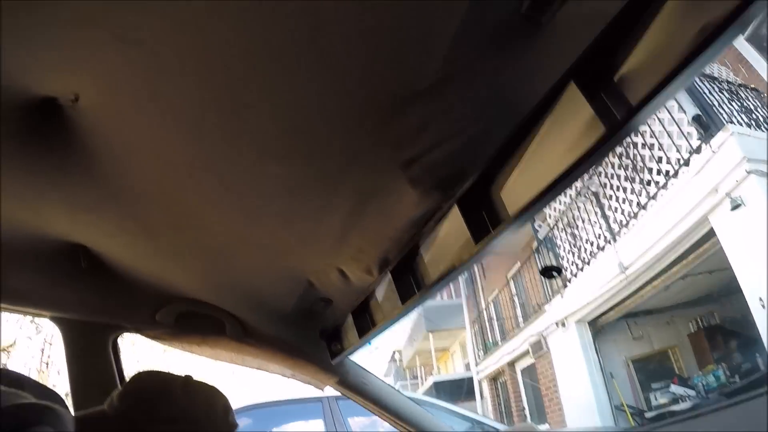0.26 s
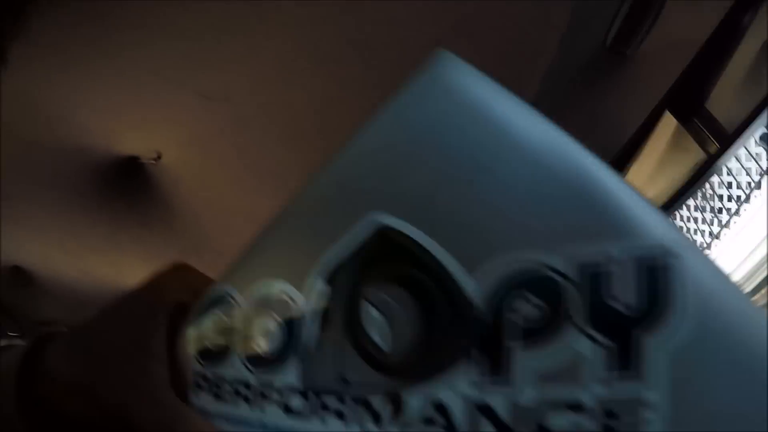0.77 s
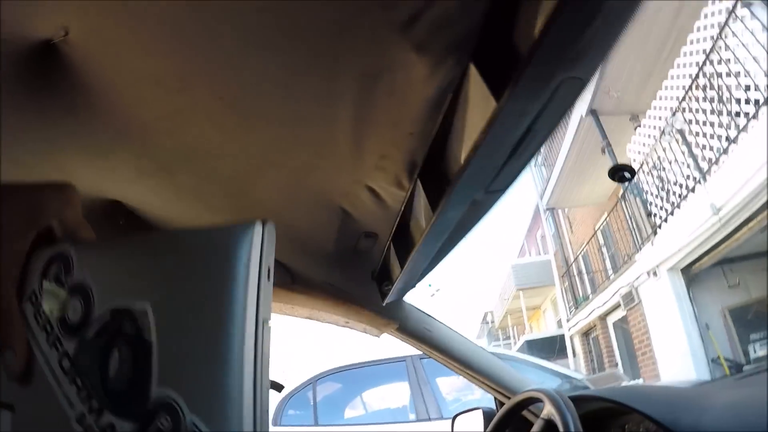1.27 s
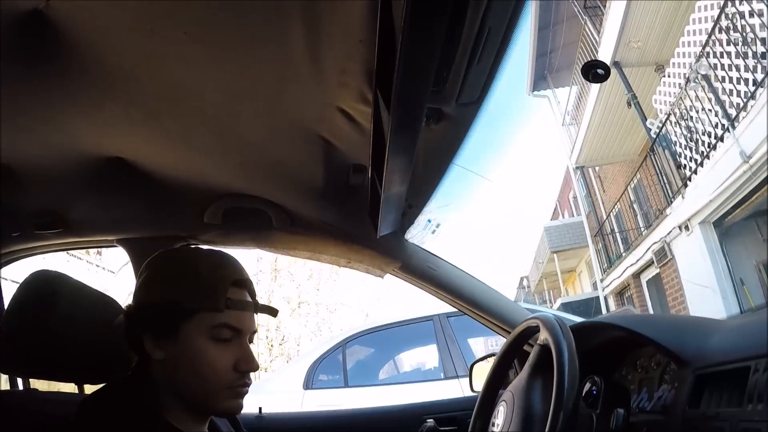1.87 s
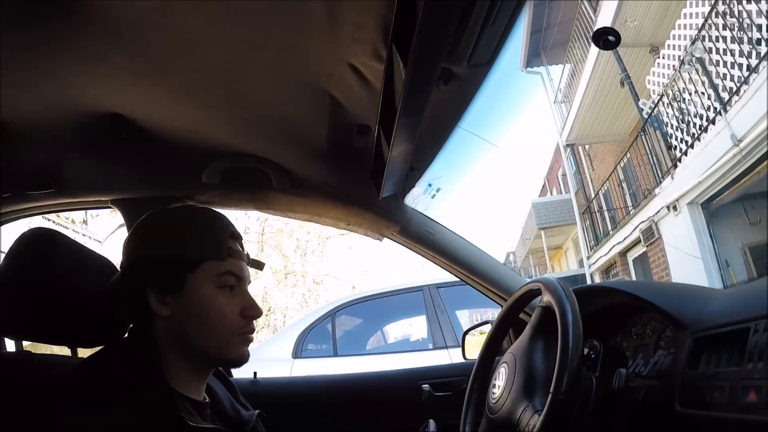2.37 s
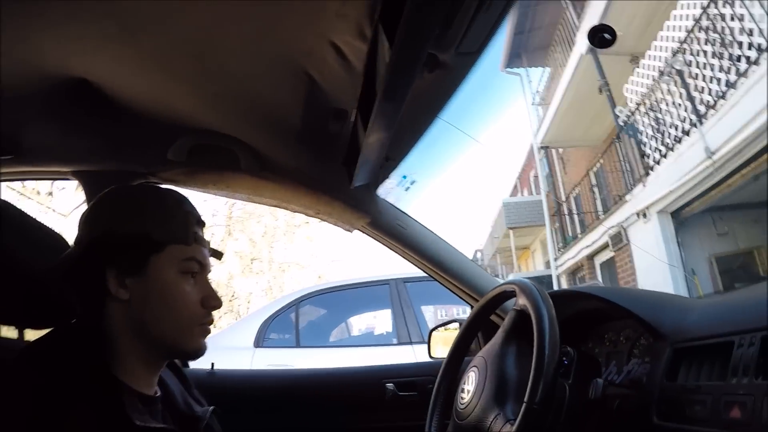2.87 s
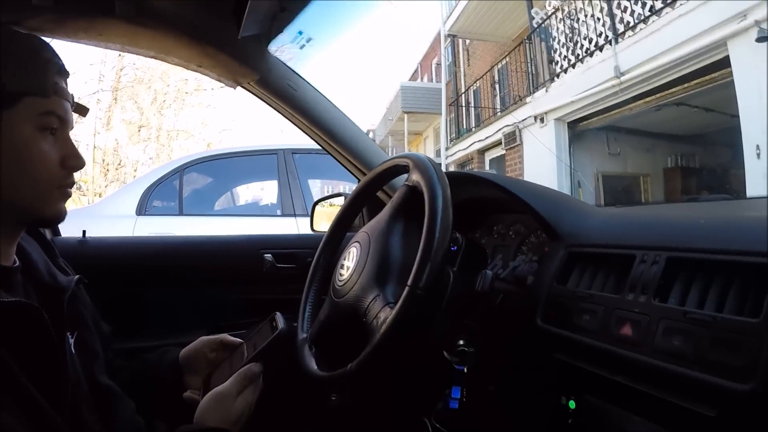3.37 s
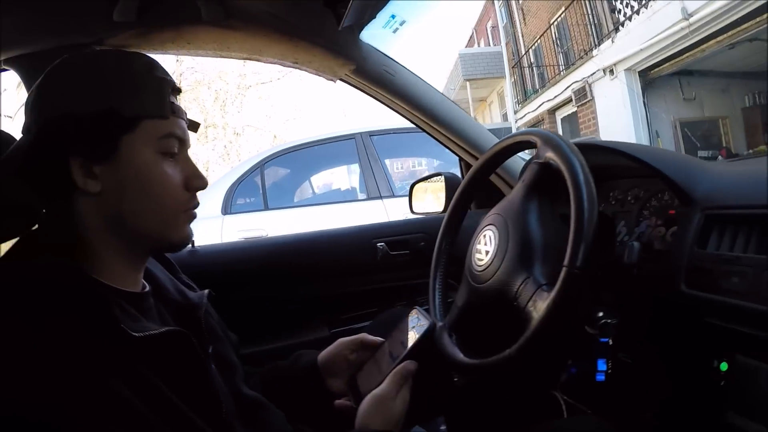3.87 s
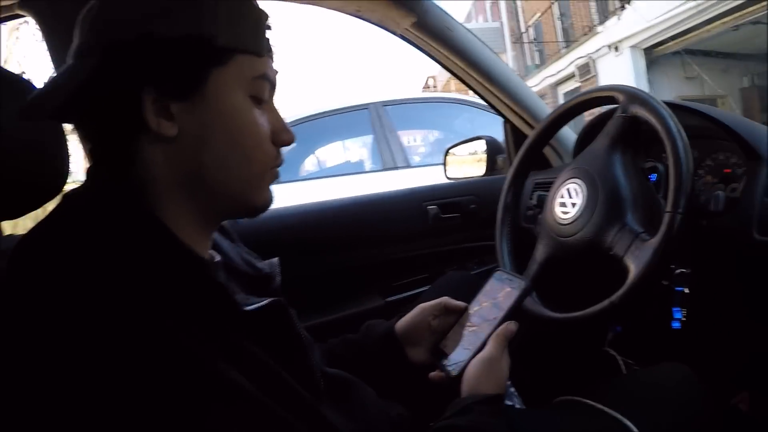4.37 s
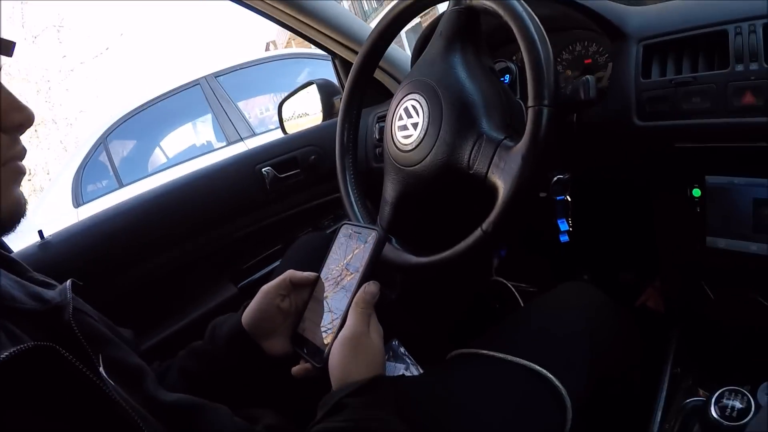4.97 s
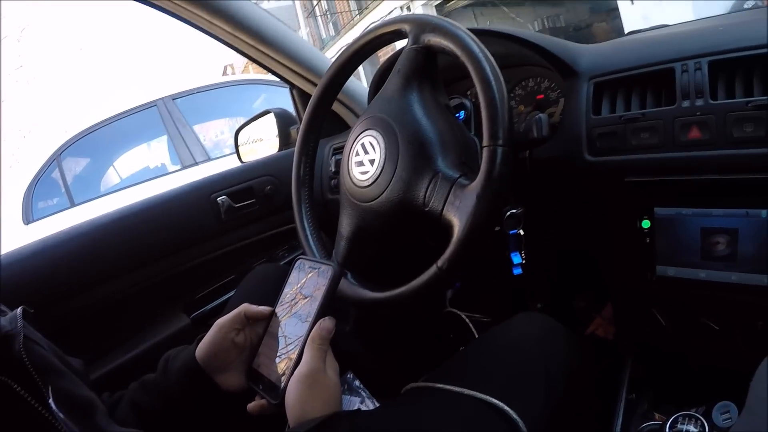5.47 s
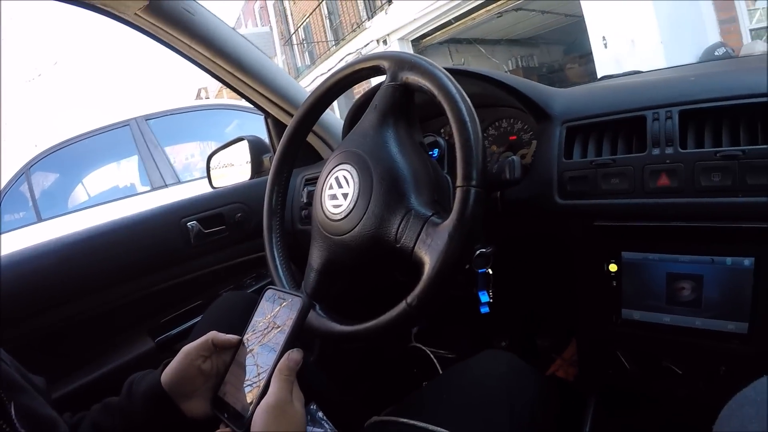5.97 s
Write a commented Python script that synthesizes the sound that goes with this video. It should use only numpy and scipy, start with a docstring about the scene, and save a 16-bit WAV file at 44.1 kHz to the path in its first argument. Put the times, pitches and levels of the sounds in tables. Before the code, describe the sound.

Boomy cabin sound of a turbocharged car at idle, heard by a handheld camera. Small case creaks precede a loud, sharp thump that briefly ducks the sound; finger knocks and clicks follow, densest near one and a half seconds. The revs then climb in two stages, the second much louder and brighter with rushing air, peak around five and a half seconds and begin sliding down. Steady light hiss lies underneath.

```python
"""A soft, uneven idle booms in a parked car's cabin amid faint plastic creaks; a hard bump soon follows.
The turbocharged four-cylinder is then revved slowly to about 3500 rpm and starts to fall back.
Firing orders are sinusoids locked to the crank phase and coloured by the cabin; gas, valve gear and
intake are pulsing noise, and turbo, soft rubs and passing swells are bands of noise. Handling of the
camera sets off decaying modes; its limiter ducks the loudest peaks and it adds a steady hiss."""
import sys
import numpy as np
from scipy import signal
from scipy.fft import rfft, irfft, next_fast_len
from scipy.io import wavfile
from scipy.ndimage import uniform_filter1d, minimum_filter1d

SR = 44100
rng = np.random.default_rng(int(sys.argv[2]) if len(sys.argv) > 2 else 0)


def digitize_waveform(pressure):
    """Quantize a signal to 16-bit integers and store it at the path in sys.argv[1].

    Rows of a 2-D input are taken as channels; values are limited to [-1, 1].
    """
    field = np.atleast_2d(pressure).T
    bounded = np.clip(field, -1, 1)
    quanta = np.round(bounded * 32767).astype(np.int16)
    wavfile.write(sys.argv[1], SR, quanta)


N = 273640
T = np.arange(N) / SR
IDLE_HZ = 25.5  # firing rate at idle

# How the exhaust grows with effort: level at idle in dB, rise in dB per Hz of firing rate above idle,
# dB added at full throttle, power to which the throttle opening is raised.
EXHAUST_LAW = (-42.5, 0.1489, 8.5, 0.8)


def boom(hz, phase, throttle, waver_db=0.58, uneven_db=1.5, slip=0.085):
    """Room modes: firing orders 1 to 4 swell and fade as they sweep the cabin's booms; uneven burns shake them."""
    # Strength of orders 1 to 4. Each row: level at idle in dB, dB added well off idle, dB added at full throttle.
    order_levels = [(1, 1, -0.5), (-4, -4, 11), (-12, 4, 6), (-27, 20, 0)]
    # Booms and nulls of the closed cabin. Each row: frequency in Hz, gain in dB.
    cabin_booms = [(25, -17), (28, -12), (30, -13), (33, -21.5), (40, -18), (45, -26.5), (49, -20.5),
                   (58, -18.5), (74, -11.5), (90, -10.5), (98, -16), (110, -13), (117, -25), (131, -17.5),
                   (150, -34), (172, -19), (195, -13), (208, -20.5), (228, -20), (262, -25), (340, -34.5),
                   (395, -29), (450, -44.5)]
    pull_hz = 22.6  # rise in firing rate over which the engine leaves its soft idle
    pulling = np.clip((hz - IDLE_HZ) / pull_hz, 0, 1)
    out = 0
    for order, (idle_db, pull_db, throttle_db) in enumerate(order_levels, 1):
        db = idle_db + pull_db * pulling + throttle_db * throttle
        db = db + waver_db * walk(5) + uneven_db * walk(25)
        angle = 2 * np.pi * (order * phase + rng.random()) + slip * walk(12)
        swing = np.sqrt(2) * np.sin(angle)
        out = out + undb(db) * response(order * hz, cabin_booms) * swing
    return out


def overtones(hz, phase, whole_db=7.0, half_db=-3.5, fall_db=1.72, count=20):
    """Fourier series of the firing pulse: higher orders, and half orders from unequal cylinders."""
    # How the cabin passes the higher exhaust orders. Each row: frequency in Hz, gain in dB.
    cabin = [(60, -5.5), (130, 9), (160, 6), (191, 11), (215, 0.5), (275, 5), (365, -2), (440, -21),
             (540, -12.5), (680, -31), (1050, -13.5), (1600, -24), (2400, -26)]
    rough_db, slip = 2.5, 0.15  # wander of the level in dB and of the phase in radians
    spread = 0.5  # widest starting offset, in cycles
    out = 0
    whole = [(k, whole_db) for k in range(5, count)]
    halves = [(k + .5, half_db) for k in range(2, count)]
    for order, db in whole + halves:
        # the orders stay roughly in step, so each firing is felt as a throb
        swing = np.cos(2 * np.pi * (order * phase + spread * rng.random()) + slip * walk(12))
        # a pulse lasts a fixed crank angle, so the sound brightens as the speed rises
        level = undb(db - fall_db * order + rough_db * walk(4.8))
        out = out + level * response(order * hz, cabin) * swing
    return out


def rocking(hz, phase, level_db=-17.0, crank_db=-28.0, coast_hz_s=35.):
    """Forced resonance: as the speed falls, the four-firing cycle and the crank's turns shake the mounts."""
    cylinders, mount_hz, width_hz = 4, 27.3, 1.8
    slowing = -np.gradient(uniform_filter1d(hz, SR // 10)) * SR  # Hz per second
    overrun = np.clip(slowing / coast_hz_s, 0, 1)
    mounts = 1 / (1 + ((hz / cylinders - mount_hz) / width_hz) ** 2)
    cycle = undb(level_db) * np.sin(2 * np.pi * phase / cylinders)
    crank = undb(crank_db) * np.sin(np.pi * phase)
    return overrun * mounts * (cycle + crank)


def engine_noise(hz, phase, throttle, rumble_db=0.66, puff=0.38, tick=0.16, flicker_db=1.5):
    """Amplitude modulation: gas rumble puffs with each firing; valve gear and intake pulse more lightly."""
    # Growth of valve gear and intake with effort; same columns as the exhaust law.
    valve_law, intake_law = (-53.5, 0.1371, 8, 1.7), (-64.5, 0.1361, 8.5, 2.5)
    # Noise spectra of gas, valve gear and intake. Each row: frequency in Hz, relative density in dB.
    gas_colour, valve_colour, intake_colour = [(20, -5.5), (45, -2), (90, -4), (140, -5.5), (190, 2),
                                               (250, 0), (320, -2.5), (380, -7), (450, -14), (650, -29.5),
                                               (1000, -56.5)], [(290, -30), (500, 6), (528, -3.5),
                                                               (704, -1.5), (755, -7), (816, -3), (983, -8),
                                                               (1060, -5.5), (1170, -7.5), (1760, -11.5),
                                                               (2190, -13.5), (2800, -20), (3200, -24),
                                                               (4160, -52.5), (7040, -120)], [(1650, -34.5), (2800, -19),
                                                                               (3290, -4.5), (3820, 3),
                                                                               (4250, 4), (4400, 0.5),
                                                                               (4490, -1), (6160, -7.5),
                                                                               (7140, -17), (7530, -23.5),
                                                                               (8740, -18.5),
                                                                               (10300, -24.5),
                                                                               (11400, -31.5), (12900, -24),
                                                                               (14000, -28.5)]
    gas_db = effort_db(EXHAUST_LAW, hz, throttle) + rumble_db
    valve_db = effort_db(valve_law, hz, throttle) + flicker_db * walk(25)
    intake_db = effort_db(intake_law, hz, throttle) + flicker_db * walk(25)
    beat = np.cos(2 * np.pi * phase)
    turn = np.cos(np.pi * phase)  # one turn of the crank is two firings
    gas = undb(gas_db) * noise(gas_colour) * (1 + puff * beat)
    valves = undb(valve_db) * noise(valve_colour)
    intake = undb(intake_db) * noise(intake_colour)
    return gas + (valves + intake) * (1 + tick * (beat + turn) / 2)


def turbo(width_hz=1500.):
    """Flow noise: a band of rushing air whose centre moves with the speed of the compressor."""
    # Course of the whoosh. Each row: time in seconds, centre in Hz, level in dB.
    whoosh = [(0, 3004, -89), (4.85, 3137, -73.5), (5.1, 3894, -47.5), (5.3, 6112, -62), (5.4, 7420, -61.5),
              (5.52, 8068, -87), (5.7, 7117, -62), (6.08, 5865, -55), (6.2, 5708, -56)]
    hz, db = curves(whoosh)
    return undb(db) * rush(hz, width_hz)


def bump():
    """Impact excitation: the camera strikes the trim and rebounds, ringing the trim's modes."""
    # Blows on the trim. Each row: start in seconds, peak in dB, contact time in ms.
    impacts = [(.4610, 1, 0.2), (.4630, 11.5, 0.87), (.4745, 2, 0.53), (.4810, 5, 2.2)]
    # Modes of the trim. Each row: frequency in Hz, level in dB, 60 dB decay time in seconds.
    trim_modes = [(163.3, 1, 0.12), (238.6, 1, 0.19), (294, -7, 0.059), (310.6, -5.5, 0.2),
                  (391.4, -7.5, 0.17), (545, -9.5, 0.12), (628, 6, 0.094), (680, 8.5, 0.041),
                  (801, 0.5, 0.096), (951, -9, 0.07), (1007, -6, 0.072), (1167, 0, 0.021),
                  (1344, -18, 0.072), (1720, 1.5, 0.044), (1857, -3, 0.029), (2090, -6, .04),
                  (2360, -19, 0.028), (4000, -24, 0.018), (4670, -2, .03)]
    return blows(impacts, trim_modes, scatter=0.0033, grit=0.68, grit_t60_s=0.086)


def knocks():
    """Impact excitation: fingers knock on the camera and ring the damped modes of the gripped body."""
    # Finger blows. Each row: start in seconds, peak in dB, contact time in ms.
    finger_hits = [(.543, -9.5, 1.4), (1.563, -21, 0.72), (1.605, -10.5, 0.69), (1.621, -14, 0.98),
                   (1.732, -21.5, 0.65), (1.785, -22.5, 1.3), (1.802, -25.5, 0.65), (2.475, -27, 0.99),
                   (2.538, -22.5, 2.1), (2.893, -23, 0.11), (2.899, -23, 0.23), (3.321, -28, 0.38),
                   (3.335, -25, 0.21), (4.475, -29.5, 0.19), (4.634, -22.5, 1.1)]
    # Modes of the gripped camera. Each row: frequency in Hz, level in dB, 60 dB decay time in seconds.
    grip_modes = [(329.5, 5.5, 0.059), (417, 3, 0.066), (596, 2.5, 0.07), (697, -2, 0.057),
                  (1015, -8.5, 0.073), (1330, -17.5, 0.042), (1890, -18, 0.0039)]
    return blows(finger_hits, grip_modes, scatter=0.095, grit=1.0, grit_t60_s=0.062)


def creaks(gain_db=3.5, grit_t60_s=0.029, tail_db=-24.0, tail_t60_s=0.2, top_db=-7.5, rise_s=0.00063):
    """Stick-slip: the plastic case slips in short clicks; where it slips decides which of its modes ring."""
    # Sharp creaks. Each row: start in seconds, level in dB before gain_db, low part in dB relative to
    # the middle part, top part in dB before top_db, ring length as a factor.
    sharp_clicks = [(0.1341, -31, 2.5, 0.5, 0.66), (0.1526, -28, 3.5, -9, 0.74),
                    (.3878, -34.5, -0.5, -6, 1.05), (0.4397, -34, 6.5, -4, 1.4), (0.4584, -23, 5, -10, 2.4),
                    (0.474, -21, 0, -21, .9), (.4814, -33, 1, -5, .8), (1.263, -32, -2, -3, 0.66),
                    (1.3896, -36.5, 2, -3, 0.65), (1.3988, -28, -1, -13, 0.64),
                    (1.4191, -29.5, -0.5, 8, 1.25), (1.4273, -36.5, 7.5, -16, 0.53),
                    (1.546, -33, 7, 2, 0.62), (1.5555, -28, 0, 3.5, 0.71), (1.5626, -24, -1, -8, 0.8),
                    (1.6625, -38.5, -11, -25, .8), (1.698, -45, -5, -5, 2.4), (2.1243, -40, -4.5, -4, 1.17),
                    (2.5166, -39, 0.5, 2, 1.6), (2.893, -31.5, -5, -9, 0.58), (2.8987, -31.5, -7, -5, 1.7),
                    (3.4084, -38.5, -23, -9, 0.71), (3.8702, -34, -9, -12.5, 0.74),
                    (4.0684, -34, 0.5, 2.5, 0.91), (4.238, -35.5, -4.5, -27, .8),
                    (4.361, -45, 6.5, -16, 0.92), (4.6782, -32.5, -14, -11, .73),
                    (4.7719, -30.5, 2, -4, 0.88), (4.8281, -39.5, 9, 3, 0.73)]
    # Modes of the case. Each row: frequency in Hz, mean level in dB, 60 dB decay time in seconds at factor 1.
    case_modes = [(1040, 1, 0.0086), (1570, -9.5, 0.0056), (1880, -7.5, 0.031), (2280, -7.5, 0.019),
                  (3280, -8.5, 0.0091), (3854, 1, 0.02), (4210, -4, 0.018), (4950, -13, 0.024),
                  (5530, -4.5, 0.018), (6170, 6.5, 0.0094), (7400, -1, 0.0068), (8460, -4, 0.01),
                  (11600, -26, 0.0092)]
    grit, uneven_db = 0.45, 3.5  # share of contact noise, spread of the mode levels
    edges_hz = ((700, 2800), (3200, 4800), (5200, 11000))  # low, middle and top parts
    bands = [signal.butter(3, edges, "band", fs=SR, output="sos") for edges in edges_hz]
    out = np.zeros(N)
    for s, db, low, top, length in [*sharp_clicks, *faint_clicks()]:
        modes = [(hz, mode_db + uneven_db * rng.standard_normal(), t60 * max(length, .2))
                 for hz, mode_db, t60 in case_modes]
        click = ring(modes, scatter=.035) + grit * crack(grit_t60_s) + undb(tail_db) * crack(tail_t60_s)
        onset = 1 - np.exp(-T[:len(click)] / rise_s)
        click = signal.fftconvolve(click * onset, slips())
        for band, part_db in zip(bands, (low, 0, top + top_db)):
            part = signal.sosfilt(band, click)
            add(out, s, undb(gain_db + db + part_db) * part / np.abs(part).max())
    return out


def faint_clicks(spread_db=2.5, low_db=2.5, top_db=-7.5, length=1.0, count=7):
    """Random stick-slip while the grip shifts: small slips, as rows like the sharp creaks."""
    # Shifts of the grip. Each row: start in seconds, end in seconds, mean level in dB before the creaks' gain.
    grip_shifts = [(0.051, 0.446, -51), (1.048, 1.386, -46), (1.402, 1.715, -45.5), (2.697, 3.393, -49),
                   (4.31, 4.897, -50)]
    clicks = []
    for start, end, db in grip_shifts:
        for k in range(count):
            s = start + (end - start) * (k + rng.random()) / count
            clicks.append((s, db + spread_db * rng.standard_normal(), low_db, top_db, length))
    return clicks


def slips(after_db=-26., within_s=0.019, count=3):
    """Impulse train: a main slip and a few faint ones as the plastic settles."""
    push = np.zeros(SR // 4)
    push[0] = 1
    for delay, size in rng.random((count, 2)):
        push[int(delay * min(within_s, .2) * SR)] += 2 * size * undb(after_db)
    return push


def rubs_and_swells():
    """Band noise: soft rubs and squeaks of the hand, low swells of the engine's boom and passing hisses,
    each under a Gaussian envelope."""
    # Noise bands. Each row: middle in seconds, length in seconds, centre in Hz, width in Hz, level in dB.
    noise_bands = [(0.313, .058, 2590, 3000, -56), (.55, 1.55, 227.5, 71, -33.5),
                   (.551, 0.078, 505, 430, -27), (0.565, 0.074, 3020, 4000, -51),
                   (0.813, .12, 3070, 54, -61.5), (1.266, .1, 708, 1400, -47),
                   (1.426, 0.018, 5620, 340, -37.5), (1.457, .25, 3940, 557, -58),
                   (1.574, 0.036, 1880, 250, -38), (2.898, .012, 2290, 4400, -34),
                   (3.216, 0.043, 1180, 470, -50.5), (3.642, .18, 194, 12.5, -27.5),
                   (3.752, 0.57, 1335, 270, -56.5), (3.91, .074, 4890, 160, -62),
                   (4.338, 0.5, 6030, 1210, -62.5), (5.364, .06, 4302, 900, -47)]
    out = 0
    for s, length, hz, width, db in noise_bands:
        envelope = np.exp(-(2 * (T - s) / length) ** 2)
        out = out + undb(db) * envelope * rush(hz, width)
    return out


def sway(level_db=-30.0, swell_db=2.5):
    """Low-frequency handling noise: the moving hand makes a deep, uneven rumble in the camera."""
    rumble = noise([(8, -6.5), (22, -14), (45, -14.0), (70, -6), (100, -19.5)])  # (Hz, relative dB)
    return undb(level_db + swell_db * walk(9.2)) * rumble


def effort_db(law, hz, throttle):
    """Source strength: an engine part is louder with speed, and louder again under throttle."""
    idle_db, db_per_hz, throttle_db, power = law
    return idle_db + db_per_hz * (hz - IDLE_HZ) + throttle_db * np.maximum(throttle, 0) ** power


def blows(hits, modes, scatter, grit, grit_t60_s):
    """Contact-time filtering: the longer a blow touches a damped body, the duller the sound."""
    out = np.zeros(N)
    for s, db, contact_ms in hits:
        age = T[:SR // 100] * 1000 / max(contact_ms, .05)  # in contact times
        push = age * np.exp(-np.pi * age)
        blow = signal.fftconvolve(ring(modes, scatter) + grit * crack(grit_t60_s), push)
        add(out, s, undb(db) * blow / np.abs(blow).max())
    return out


def ring(modes, scatter):
    """Modal superposition: free decay of modes in alternating polarity, each a little detuned by the grip."""
    t = T[:SR // 4]
    out = 0
    for k, (hz, db, t60) in enumerate(modes):
        detuned_hz = hz * (1 + scatter * rng.standard_normal())
        out = out + (-1) ** k * undb(db - 60 * t / t60) * np.sin(2 * np.pi * detuned_hz * t)
    return out


def crack(t60_s):
    """Exponential decay: a short burst of contact noise."""
    t = T[:SR // 4]
    return rng.standard_normal(len(t)) * undb(-60 * t / t60_s)


def rush(hz, width_hz):
    """Frequency shifting: low-passed complex noise turned to a steady or moving centre, rms 1."""
    lowpass = signal.butter(3, width_hz / 2, fs=SR, output="sos")
    air = signal.sosfilt(lowpass, rng.standard_normal((2, N)))
    carrier = np.exp(2j * np.pi * np.cumsum(hz * np.ones(N)) / SR)
    return unit(np.real((air[0] + 1j * air[1]) * carrier))


def noise(points):
    """Spectral shaping: white noise given a colour, falling steeply beyond its last point, rms 1."""
    size = next_fast_len(N)
    hz = np.arange(size // 2 + 1) * SR / size
    gain = response(hz, points) / (1 + (hz / (2 * points[-1][0])) ** 4)
    return unit(irfft(rfft(rng.standard_normal(size)) * gain, size)[:N])


def response(hz, points):
    """Transfer function: gain at the given frequencies, from (Hz, dB) points on a log frequency axis."""
    f, db = np.transpose(points)
    return undb(np.interp(np.log(np.maximum(hz, 1)), np.log(f), db))


def walk(rate):
    """Random modulation: smooth chance of rms 1, changing `rate` times a second."""
    k = max(int(SR / rate), 1)
    steps = np.repeat(rng.standard_normal(N // k + 1), k)
    return unit(uniform_filter1d(steps, k)[:N])


def curves(rows):
    """Linear interpolation: the columns of a timed table, one value a sample."""
    s, *columns = np.transpose(rows)
    return [np.interp(T, s, c) for c in columns]


def undb(db):
    """Logarithmic level: decibels to amplitude gain."""
    return 10 ** (np.asarray(db) / 20)


def unit(x):
    """Normalisation: scale to rms 1."""
    return x / np.sqrt(np.mean(x ** 2))


def add(out, s, sound):
    """Superposition: mix a short sound in at time s."""
    i = int(s * SR)
    out[i:i + len(sound)] += sound[:N - i]


def scene():
    """Superposition of engine, turbo, camera handling and noise bands, engine parts sharing one crank phase."""
    # Engine speed. Each row: time in seconds, firing rate in Hz.
    speed = [(0, 25.1), (.4, 25.25), (1.4, 26.13), (2.25, 24.9), (3.1, 26.23), (3.23, 27.2), (3.4, 30.25),
             (3.53, 36.3), (3.75, 43.1), (4.02, 46.15), (4.4, 48.88), (4.62, 51.82), (4.84, 59.36),
             (4.95, 65.93), (5.14, 85.72), (5.28, 100.2), (5.38, 109.1), (5.52, 115.2), (5.79, 105.5),
             (6.0, 96.1), (6.2, 89.3)]
    # The pedal. Each row: time in seconds, throttle opening from 0 to 1.
    pedal = [(3.15, 0), (3.4, 0.04), (3.58, 0.39), (4.15, 0.05), (4.5, 0.27), (4.8, 0.55), (5.02, 0.93),
             (5.38, 0.91), (5.58, 0.09), (5.95, 0.09), (6.2, 0.14)]
    (hz,), (throttle,) = curves(speed), curves(pedal)
    phase = np.cumsum(hz) / SR  # in firings
    exhaust = undb(effort_db(EXHAUST_LAW, hz, throttle)) * overtones(hz, phase)
    engine = boom(hz, phase, throttle) + exhaust + rocking(hz, phase) + engine_noise(hz, phase, throttle)
    handling = bump() + knocks() + creaks() + sway()
    return (engine + turbo() + handling + rubs_and_swells())[None]


def limiter(x, ceiling=0.85, hold_s=0.36, release_s=0.19, deepest_db=-8.0):
    """Peak limiting: a fast gain drop on a peak, a hold and a release; what is still too loud clips."""
    need = np.clip(ceiling / np.maximum(np.abs(x), 1e-9), undb(deepest_db), 1)
    hold, release = int(hold_s * SR) | 1, int(release_s * SR) | 1
    # the shifted origins make both windows look back in time
    held = minimum_filter1d(need, hold, origin=hold // 2, mode="nearest")
    released = uniform_filter1d(held, release, origin=release // 2, mode="nearest")
    gain = np.minimum(held, released)
    ahead = SR // 300  # a short centred window eases the gain down just before the peak
    eased = uniform_filter1d(minimum_filter1d(gain, ahead), ahead)
    return np.clip(x * eased, -ceiling, ceiling)


def record(dry, hiss_db=-65.0, top_hz=15000):
    """Dynamic range and bandwidth: the camera limits the peaks, adds its own steady hiss and cuts the top."""
    # Spectrum of the microphone hiss. Each row: frequency in Hz, relative density in dB.
    hiss_colour = [(300, -2.5), (3000, -6.5), (7500, -6), (8600, 1), (10500, -4), (12000, -8.5),
                   (15000, -14.5)]
    sound = limiter(dry[0]) + undb(hiss_db) * noise(hiss_colour)
    lowpass = signal.ellip(8, .2, 70, top_hz, fs=SR, output="sos")
    return signal.sosfilt(lowpass, sound)[None]


dry = scene()
out = record(dry)
digitize_waveform(out)
```